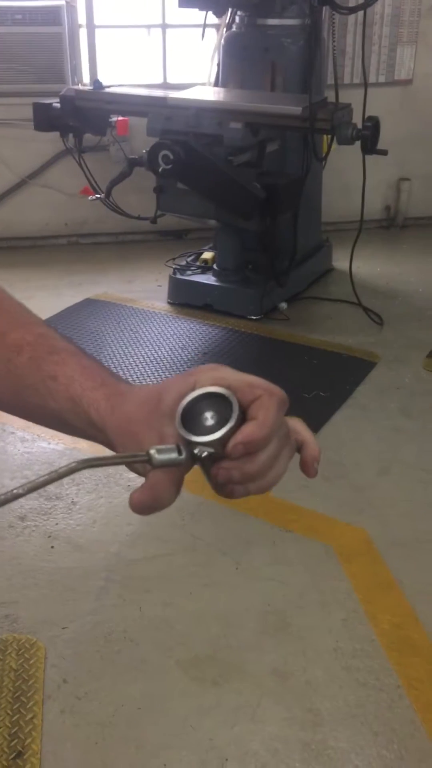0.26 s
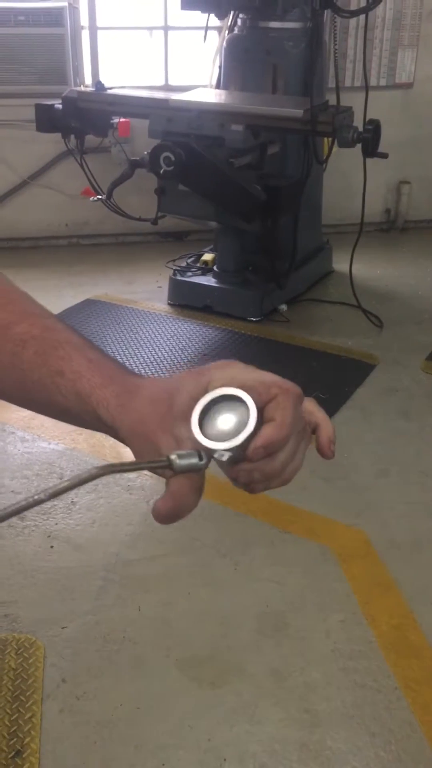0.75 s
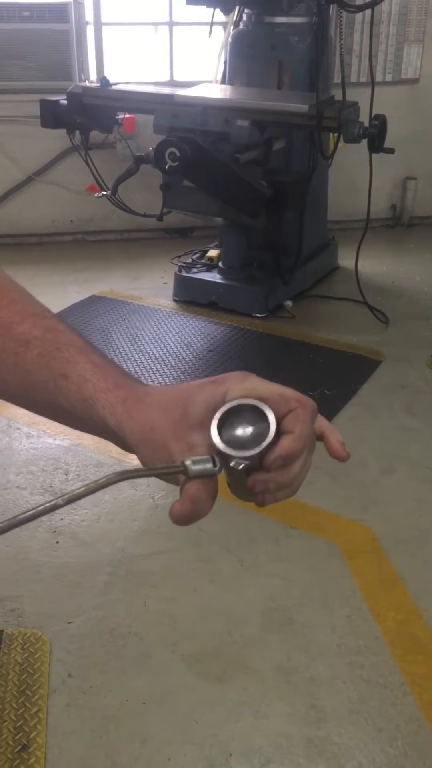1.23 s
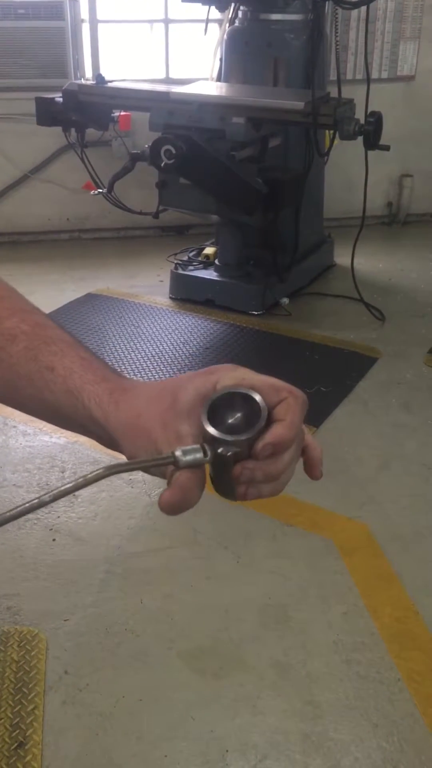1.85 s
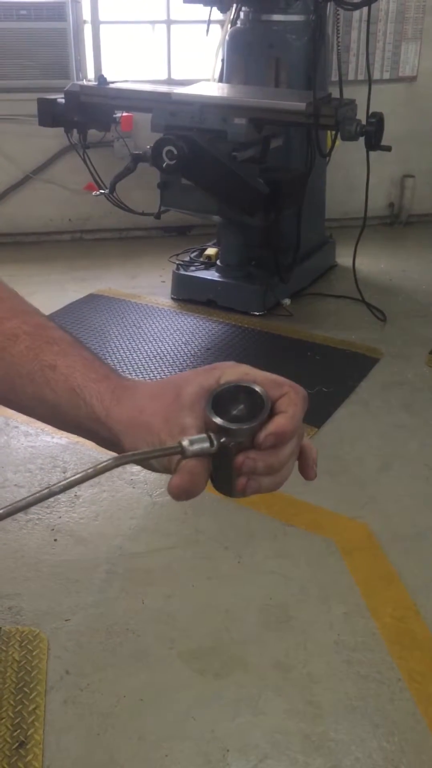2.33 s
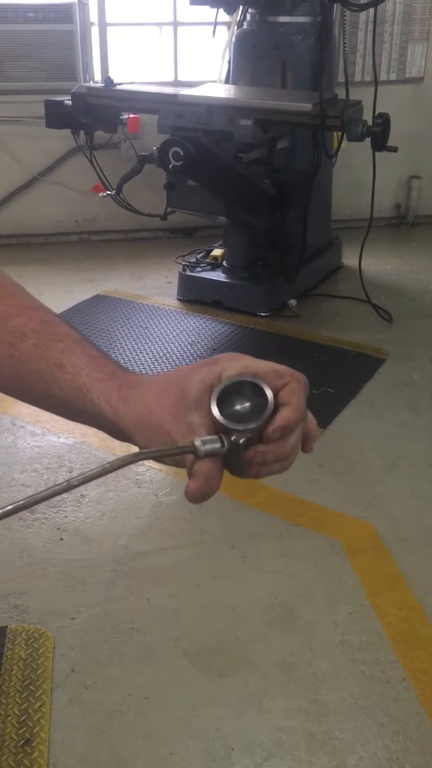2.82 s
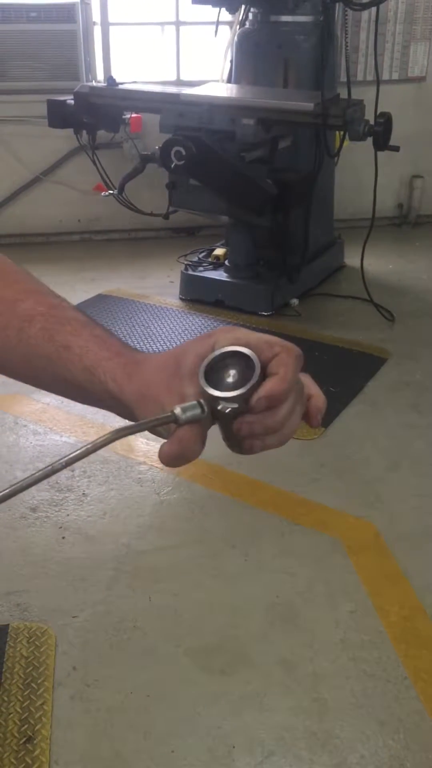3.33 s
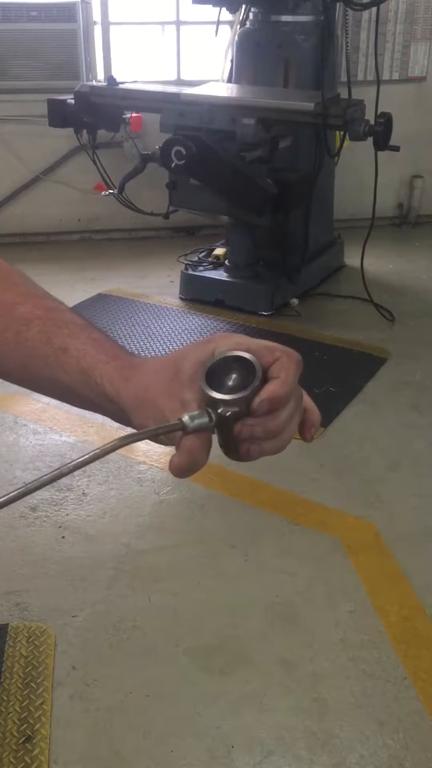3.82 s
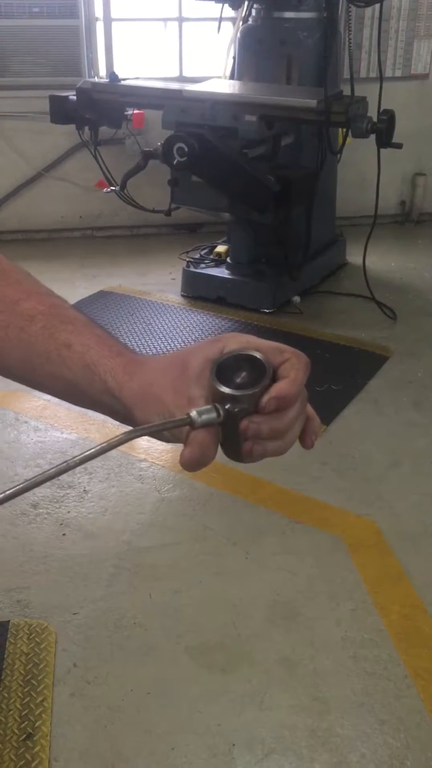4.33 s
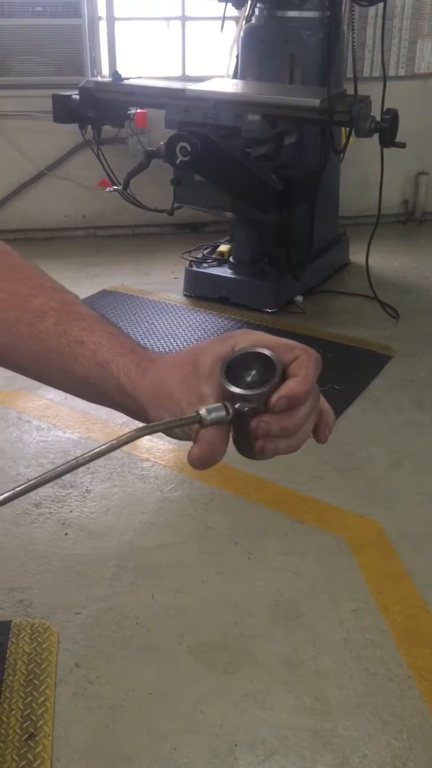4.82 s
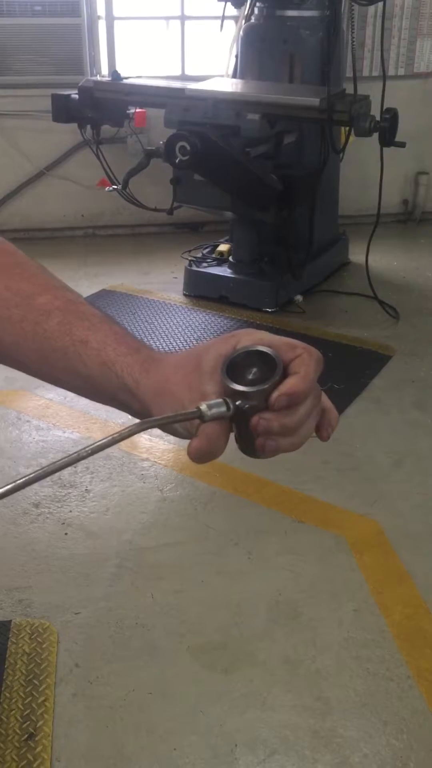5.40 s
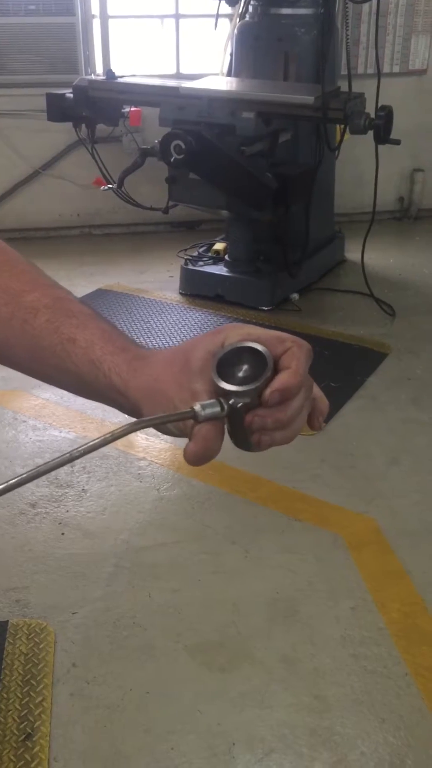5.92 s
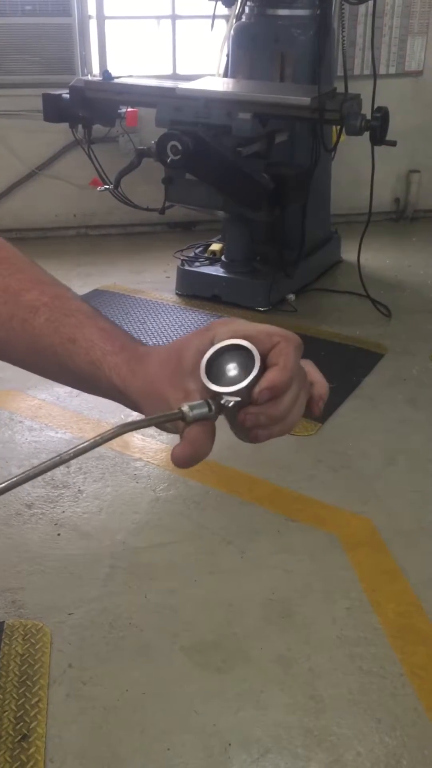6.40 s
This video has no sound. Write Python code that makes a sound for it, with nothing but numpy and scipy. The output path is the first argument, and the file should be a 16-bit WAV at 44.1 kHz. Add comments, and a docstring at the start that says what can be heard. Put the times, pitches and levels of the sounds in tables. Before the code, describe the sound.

A hissing air jet spins a small turbine up to a piercing, wavering whine, close up in a hard-walled workshop.

```python
"""A workshop: a six-bladed turbocharger wheel, held in the hand, is spun by a blow gun close to one microphone.
A short pop and thump open the take. The blades chop the jet into a siren-like whine of sine partials that
follows the shaft speed, and swells and drops out as echoes meet it.
Coloured noise makes the air: rush in the housing, hiss on the blades, fizz at the nozzle.
The shop answers through a decaying noise tail, machines hum underneath, stray air rumbles on the microphone."""
import sys
import numpy as np
from scipy import signal
from scipy.fft import rfft, irfft, next_fast_len
from scipy.io import wavfile
from scipy.ndimage import uniform_filter1d, map_coordinates

SR = 44100
rng = np.random.default_rng(int(sys.argv[2]) if len(sys.argv) > 2 else 0)


def inscribe(sig):
    """Save sig as 16-bit PCM at rate SR to the path in sys.argv[1].

    A 1-D sig is mono; a 2-D sig holds one channel per row.
    Samples are clipped to [-1, 1] before scaling.
    """
    pcm = np.round(np.clip(np.atleast_2d(sig).T, -1, 1) * 32767)
    wavfile.write(sys.argv[1], SR, pcm.astype(np.int16))


N = 293749

# colour of the opening crack: (frequency [Hz], density [dB per Hz])
POP_COLOUR = [(40, -6), (140, 4), (290, -10), (400, 2), (550, -9), (750, -5.5), (1500, -8), (5000, -12.5),
              (15000, -24)]
# colour of stray air, also of the opening thump: (frequency [Hz], density [dB per Hz])
BUFFET_COLOUR = [(20, -36), (45, -3), (75, 0.5), (170, -10), (300, -22), (1500, -68)]
# speed of the shaft: (time [s], turns per second [Hz])
SHAFT_SPEED = [(0, 280.7), (0.09, 296.2), (0.37, 355), (0.61, 388.2), (0.89, 404), (1.22, 411.2),
               (1.45, 429), (1.68, 432), (1.97, 447), (2.38, 456.7), (2.6, 450.4), (2.76, 451),
               (2.9, 436.5), (3.06, 429.6), (3.28, 438.4), (3.42, 429.8), (3.59, 412.2), (3.72, 421),
               (4.02, 426.1), (4.49, 452.0), (4.69, 452.9), (5.13, 467.6), (5.29, 468), (5.48, 459.2),
               (5.65, 465.6), (5.9, 465.6), (6.02, 470.6), (6.25, 470.4), (6.53, 464.6), (6.66, 453.3)]
# blade-pass tone, swelling and fading as direct sound and room echoes interfere: (time [s], level [dB])
WHINE_LEVEL = [(0, -42), (0.1, -26), (0.15, -33.5), (0.44, -25.4), (0.52, -40), (0.72, -25), (1.17, -21.8),
               (1.25, -34), (1.31, -22.5), (1.66, -15.2), (1.74, -28.5), (1.85, -15.5), (2.02, -32),
               (2.13, -28), (2.21, -15.5), (2.87, -20.5), (3.17, -21), (3.26, -13.5), (3.38, -11.5),
               (3.44, -23), (3.55, -13.5), (3.95, -24), (4.22, -16), (4.48, -19.5), (4.58, -29.1),
               (4.66, -31), (4.73, -14), (4.9, -19.5), (4.97, -28), (5.54, -14.5), (5.6, -28),
               (5.74, -16.5), (5.92, -23.8), (6.25, -15.5), (6.31, -23), (6.49, -21), (6.66, -27.6)]
# its octave: (time [s], level [dB])
OCTAVE_LEVEL = [(0, -40), (0.31, -29), (0.38, -25.6), (0.8, -31.7), (1.12, -25), (1.55, -30), (1.64, -21),
                (2.08, -20.0), (2.58, -27.5), (2.83, -18.3), (2.96, -26.1), (3.08, -21), (3.24, -29),
                (3.75, -25.5), (4.65, -17.5), (4.92, -30.5), (5.08, -21.5), (5.55, -25.5), (5.77, -16),
                (5.86, -21.6), (6.3, -24), (6.42, -17.5), (6.66, -20)]
# third blade harmonic: (time [s], level [dB])
THIRD_LEVEL = [(0, -38), (0.65, -31.9), (0.95, -39), (1.6, -40), (2.4, -28), (2.9, -54), (3.25, -31.5),
               (4.7, -33.5), (5.2, -27), (5.6, -28.5), (6.25, -24.5), (6.66, -34)]
# tones of unequal blades and the top blade overtones: (shaft order [per turn], level re the rush curve [dB])
FAINT_TONES = [(4, -29.5), (5, -23), (7, -20), (24, -20.5), (30, -26)]
# the jet, before the trims in jet(): (time [s], fizz at the nozzle [dB], hiss on the blades [dB])
JET_LEVELS = [(0.04, -33.5, -37.5), (0.17, -34.5, -34), (0.22, -28, -29), (0.63, -30.5, -29.5),
              (0.87, -25.5, -29.5), (1.13, -25.5, -27), (1.31, -23.5, -23.5), (2.93, -23.5, -23),
              (3.67, -25.5, -27), (5.24, -22.5, -24), (5.64, -23, -24.5), (5.74, -23.5, -24),
              (5.9, -24, -25), (6.66, -24, -28)]
# turbulence of the jet: (frequency [Hz], density [dB per Hz])
TURBULENCE_COLOUR = [(25, -29), (110, -13.5), (220, -15), (700, -16), (1400, -11.5), (2400, -4),
                     (3500, -2.5), (5000, -3), (6400, -2), (7700, -6), (9200, -2.5), (10500, -7),
                     (11500, -5), (15000, -3.5)]
# air resonances of housing and cupped hand, with a slight dip at 6440 Hz and a deeper one at 10500 Hz:
# (centre [Hz], width [Hz], height [dB])
HOUSING_RESONANCES = [(1013, 300, 4.5), (1486, 290, 4.5), (1780, 66, 4.5), (2180, 63, 2.5),
                      (2932, 150, 8.5), (3420, 193, 7), (3787, 330, 6), (4353, 150, 7), (5660, 210, 1.5),
                      (6200, 150, 4.5), (6440, 180, -0.5), (6700, 220, 3.5), (10500, 550, -3)]
# whine sent in all directions into the shop, before its swell: (shaft order [per turn], level [dB])
SPILL_TONES = [(6, -31), (12, -37)]
# reverberation of the shop: (frequency [Hz], time to fall 60 dB [s])
SHOP_DECAY = [(200, 1.1), (2500, 1.4), (6000, 1.1), (15000, 0.27)]
# machines in the shop, once the hum is fully up: (frequency [Hz], level [dB])
MACHINE_HUM = [(50.6, -55), (59.2, -50.5), (113, -64), (554.5, -63)]
# stray air on the microphone: (time [s], time from peak to 1/e [s], peak level [dB])
STRAY_AIR = [(1.302, 0.036, -39), (1.381, .021, -33.5)]

CRUISE_HZ = 468  # usual shaft speed
# once-a-turn hum of the shaft at cruising speed [dB], and its growth with speed [dB per Hz]
UNBALANCE_DB, UNBALANCE_DB_PER_HZ = -51.5, 0.2
# strength of the echoes that cancel a tone, re the direct sound
WHINE_FADE, OVERTONE_FADE = 0.56, 0.75
# how often they change: per second as the hand sways, and per Hz of shaft speed gained or lost
FADE_PER_S, FADE_PER_HZ = 12, 0.17
# rush curve: level at cruise and median fizz, before jet() trims it [dB]; dB per dB of fizz; dB per Hz of speed
RUSH_DB, RUSH_GROWS, RUSH_DB_PER_HZ = -21, 0.71, 0.0282
TOP_HZ = 15750  # band limit of the recorder


def amp(db):
    """Decibels to gain."""
    return 10 ** (np.asarray(db) / 20)


def unit(x):
    """x at rms 1."""
    return x / np.sqrt(np.mean(x ** 2) + 1e-20)


def clock():
    """The time of every sample, in seconds."""
    return np.arange(N) / SR


def along(points, hz):
    """Interpolate (Hz, value) points on a log frequency axis."""
    point_hz, values = np.transpose(points)
    return np.interp(np.log(hz + 1), np.log(point_hz + 1), values)


def curves(rows):
    """One value per sample for each column after the time."""
    times, *columns = np.transpose(rows)
    return [np.interp(clock(), times, column) for column in columns]


def wobble(rate):
    """A smooth random curve through `rate` knots a second."""
    knots = rng.standard_normal(int(N * rate / SR) + 4)
    return map_coordinates(knots, [clock() * rate])


def filtered(x, response):
    """x shaped by a gain that depends on frequency; the padding keeps its end off its start."""
    size = next_fast_len(N + SR // 2)
    spectrum = rfft(x, size) * response(np.fft.rfftfreq(size, 1 / SR))
    return irfft(spectrum, size)[:N]


def noise(response):
    """Noise of rms 1 with the given colour."""
    return unit(filtered(rng.standard_normal(N), response))


def flutter(width_hz):
    """Random motion of rms 1 that fades above width_hz."""
    def response(hz):
        gentle = 1 / np.sqrt(1 + (hz / width_hz) ** 2)
        return gentle / (1 + (hz / (10 * width_hz)) ** 2)
    return noise(response)


def pop(at=0.006, length=0.0061, crack_db=-7, thump_db=-17, thump_t60=0.1):
    """A short sharp noise burst with a low, exponentially dying thump under it; times in seconds."""
    t = clock()
    burst = np.exp(-((t - at) / length) ** 2)
    crack = amp(crack_db) * burst * noise(lambda hz: amp(along(POP_COLOUR, hz)))
    thump = amp(thump_db - 60 * t / thump_t60) * noise(lambda hz: amp(along(BUFFET_COLOUR, hz)))
    return crack + thump


def shaft_angle():
    """How far the shaft has turned, in radians: the running sum of its slightly unsteady speed."""
    speed_hz = curves(SHAFT_SPEED)[0] * (1 + 0.00018 * wobble(25))
    return 2 * np.pi * np.cumsum(speed_hz) / SR


def braking(full_hz=70):
    """0 while the shaft gains speed, 1 when it loses full_hz or more a second."""
    slope = np.gradient(curves(SHAFT_SPEED)[0]) * SR  # Hz per second
    return np.clip(-uniform_filter1d(slope, size=SR // 4) / full_hz, 0, 1)


def blade_tone(phase, level_db, rough, width_hz):
    """One partial of the chopped jet; eddies shake its strength and its phase."""
    steady = np.sin(phase)
    shaken = flutter(width_hz) * steady + flutter(width_hz) * np.cos(phase)
    return amp(level_db) * unit(steady + rough * shaken)


def fading(depth):
    """Echoes cancel a tone now and then, more often while the pitch moves; local mean power is held."""
    glide_hz = np.abs(np.gradient(curves(SHAFT_SPEED)[0]))  # change per sample
    turns = np.cumsum(FADE_PER_S / SR + FADE_PER_HZ * glide_hz)
    knots = rng.standard_normal(size=(2, 1024))
    in_phase, across = (map_coordinates(row, [turns], mode="wrap") for row in knots)
    gain = np.tanh(np.hypot(1 + depth * in_phase, depth * across))  # direct sound plus echo, peaks softened
    return gain / np.sqrt(uniform_filter1d(gain ** 2, size=SR // 6))


def faded_tone(phase, level_db, depth, rough, width_hz):
    """A blade tone as it reaches the microphone, direct sound and echoes together, with brief dropouts."""
    return fading(depth) * blade_tone(phase, level_db, rough, width_hz)


def rush_level():
    """The rush in the housing follows the flow from the nozzle and the pumping of the wheel, in dB."""
    fizz_db = curves(JET_LEVELS)[0]
    flow_db = RUSH_GROWS * (fizz_db - np.median(fizz_db))
    pumping_db = RUSH_DB_PER_HZ * (curves(SHAFT_SPEED)[0] - CRUISE_HZ)
    return RUSH_DB + flow_db + pumping_db


def wheel(angle):
    """Six blades cut the jet on every turn: blade harmonics, the hum of unbalance and faint other orders."""
    blade = 6 * angle
    # while the shaft slows, the direct tone beats with its own sound in the room and flutters
    slowing = braking()
    whine_db, octave_db, third_db = (curves(rows)[0] for rows in (WHINE_LEVEL, OCTAVE_LEVEL, THIRD_LEVEL))
    whine = faded_tone(blade, whine_db, WHINE_FADE, rough=0.09 + 0.24 * slowing, width_hz=23)
    whine += faded_tone(2 * blade, octave_db, OVERTONE_FADE, rough=0.22 + 0.11 * slowing, width_hz=26)
    whine += faded_tone(3 * blade, third_db, OVERTONE_FADE, rough=0.38, width_hz=27)
    unbalance_db = UNBALANCE_DB + UNBALANCE_DB_PER_HZ * (curves(SHAFT_SPEED)[0] - CRUISE_HZ)
    whine += blade_tone(angle, unbalance_db, rough=0.1, width_hz=14)
    rush_db = rush_level()
    for order, db in FAINT_TONES:
        whine += blade_tone(round(order) * angle, rush_db + db, rough=0.33, width_hz=15)
    return whine


def jet_colour(hz):
    """Broad turbulence, lifted at the resonances of the housing and dipped at two places."""
    peaks_db = sum(db / (1 + (2 * (hz - centre) / width) ** 2) for centre, width, db in HOUSING_RESONANCES)
    return amp(along(TURBULENCE_COLOUR, hz) + peaks_db)


def below(hz, edge_hz):
    """Share of the power that falls under a soft band edge."""
    return 1 / (1 + (hz / edge_hz) ** 16)


def jet():
    """Air rushes in the housing, hisses on the blades and fizzes at the nozzle: three unsteady noise bands."""
    fizz_db, hiss_db = curves(JET_LEVELS)
    rush_db = rush_level()
    hiss_hz, fizz_hz = 5000, 7700  # lower edges of the two upper bands
    rush = noise(lambda hz: jet_colour(hz) * np.sqrt(below(hz, hiss_hz)))
    hiss = noise(lambda hz: jet_colour(hz) * np.sqrt((1 - below(hz, hiss_hz)) * below(hz, fizz_hz)))
    fizz = noise(lambda hz: jet_colour(hz) * np.sqrt(1 - below(hz, fizz_hz)))
    air = amp(rush_db - 3.5 + 0.21 * wobble(22)) * rush
    air += amp(hiss_db + 0.33 + 0.43 * wobble(22.26)) * hiss
    air += amp(fizz_db + 2.7 + 0.55 * wobble(22)) * fizz
    shared_db = 0.55 * wobble(14) + 0.45 * wobble(70)
    return air * amp(shared_db)


def spill(angle):
    """Summed over all directions, the whine is much steadier than what meets the microphone directly."""
    smooth_db = uniform_filter1d(curves(WHINE_LEVEL)[0], size=SR // 4)
    swell_db = 0.42 * (smooth_db - smooth_db.mean())
    return sum(blade_tone(round(order) * angle, db + swell_db, rough=0.74, width_hz=17)
               for order, db in SPILL_TONES)


def shop(x):
    """The answer of the hard floor and walls, a decaying noise tail; the top treble dies first."""
    hz, t, z = signal.stft(rng.standard_normal(SR), SR, nperseg=256)
    decay = amp(-60 * t / along(SHOP_DECAY, hz)[:, None])
    tail = signal.istft(z * decay, SR, nperseg=256)[1]
    return signal.fftconvolve(x, tail / np.linalg.norm(tail))[:N]


def hum():
    """Machines hum as steady sines; the two lowest beat against each other."""
    return sum(amp(db) * unit(np.sin(2 * np.pi * (hz * clock() + rng.random()))) for hz, db in MACHINE_HUM)


def buffets():
    """Stray air brushes the microphone: low noise under short bell-shaped swells."""
    swell = sum(amp(db) * np.exp(-((clock() - s) / length) ** 2) for s, length, db in STRAY_AIR)
    return swell * noise(lambda hz: amp(along(BUFFET_COLOUR, hz)))


def scene():
    """Wheel and jet near the microphone, the shop around them; both channels carry the one microphone."""
    angle, air = shaft_angle(), jet()
    room = shop(spill(angle) + amp(-8) * air)
    hum_db = np.interp(clock(), [0.6, 1.4], [-5, 0])  # the hum comes up between these times
    mono = pop() + wheel(angle) + air + room + amp(hum_db) * hum() + buffets()
    return np.array([mono, mono])


def record(dry):
    """The recorder rounds off the highest peaks and keeps nothing above its band limit."""
    rounded = dry / (1 + np.abs(dry / 0.88) ** 12) ** (1 / 12)
    return np.array([filtered(channel, lambda hz: hz < TOP_HZ) for channel in rounded])


dry = scene()
out = record(dry)
inscribe(out)
```